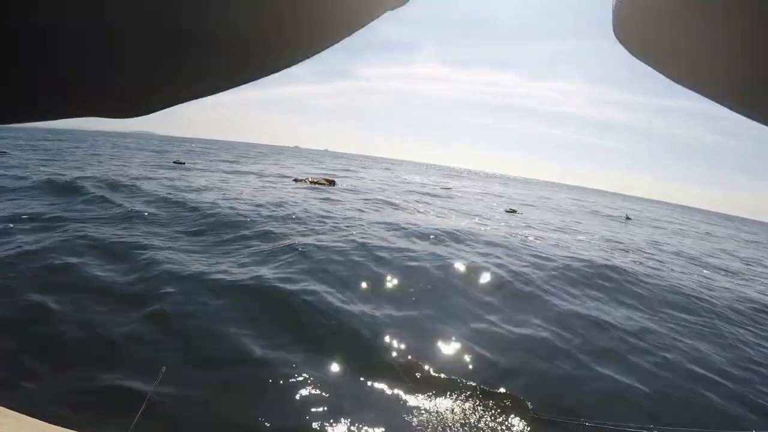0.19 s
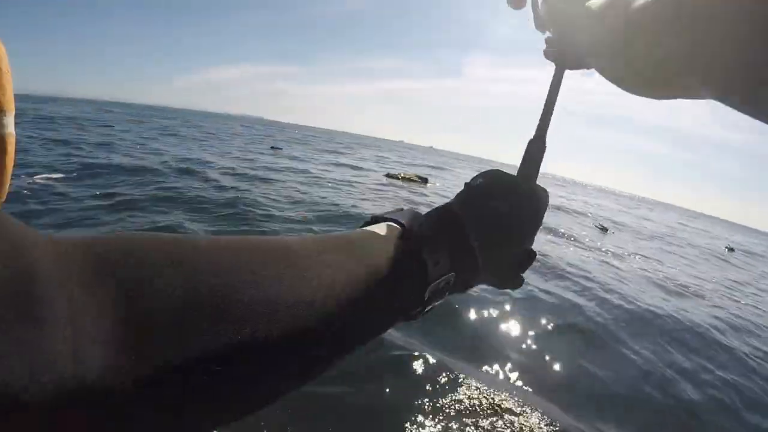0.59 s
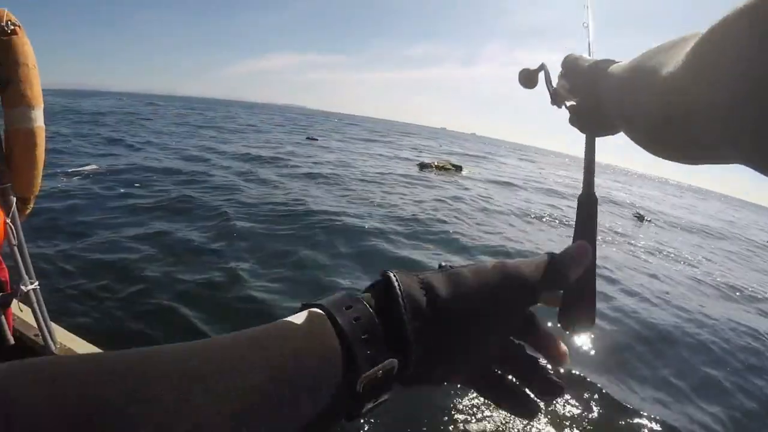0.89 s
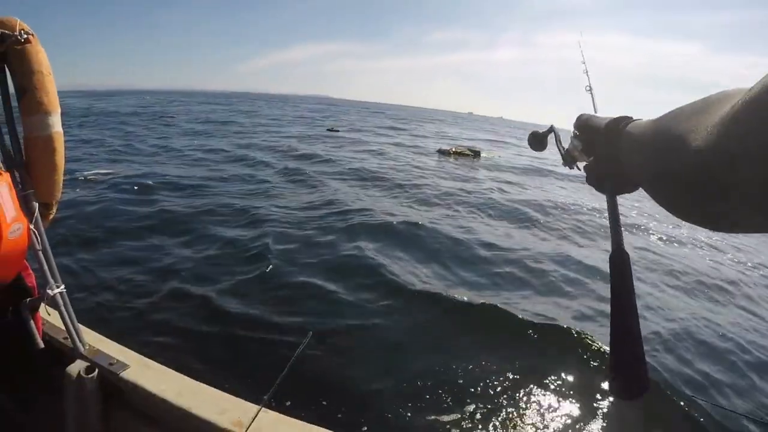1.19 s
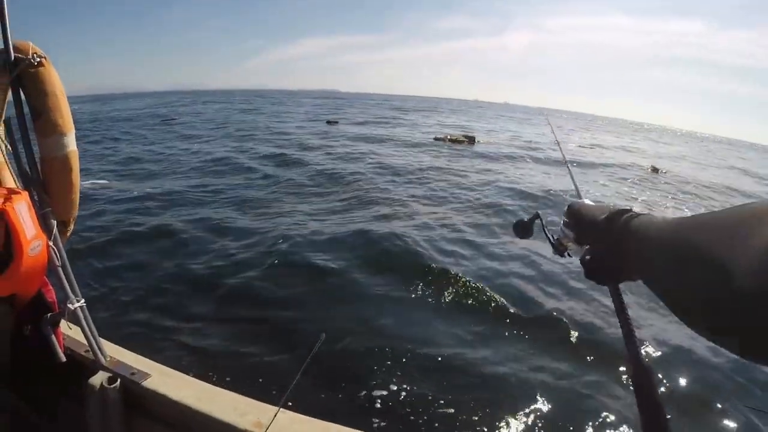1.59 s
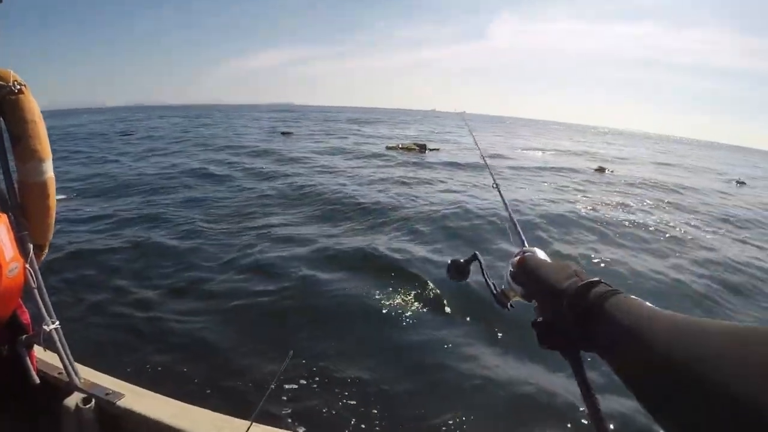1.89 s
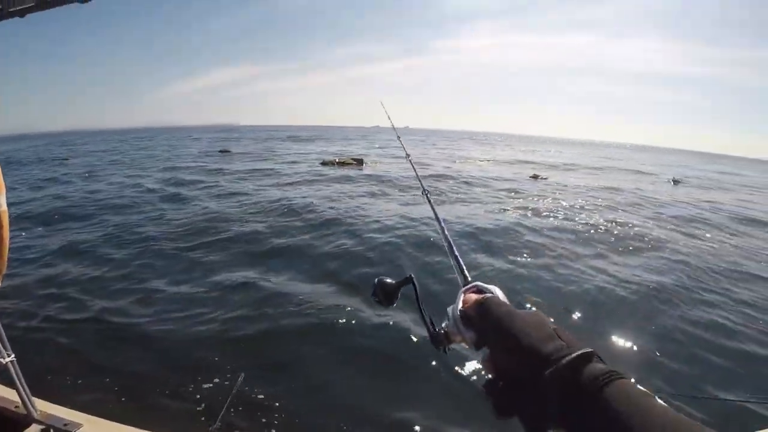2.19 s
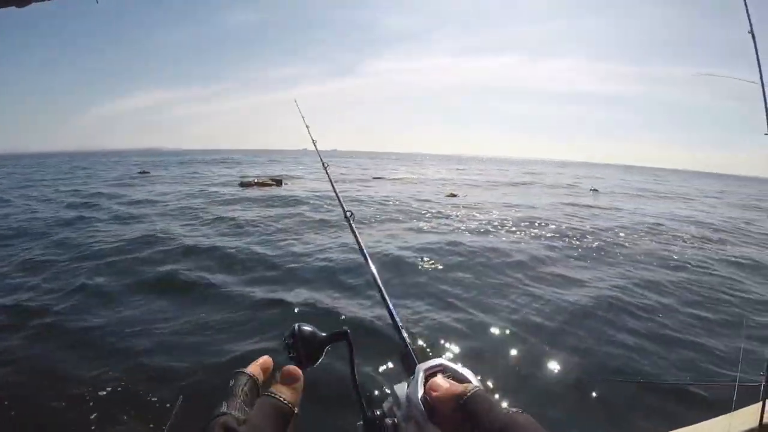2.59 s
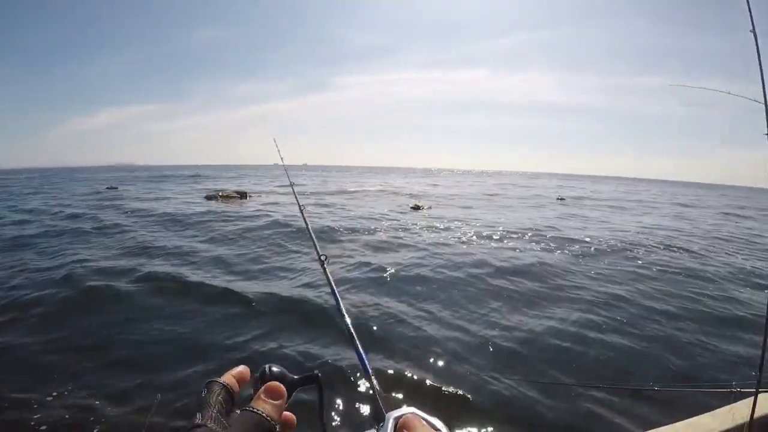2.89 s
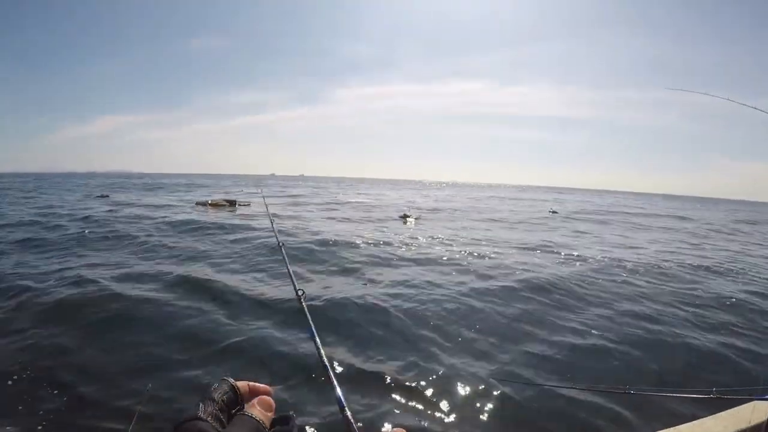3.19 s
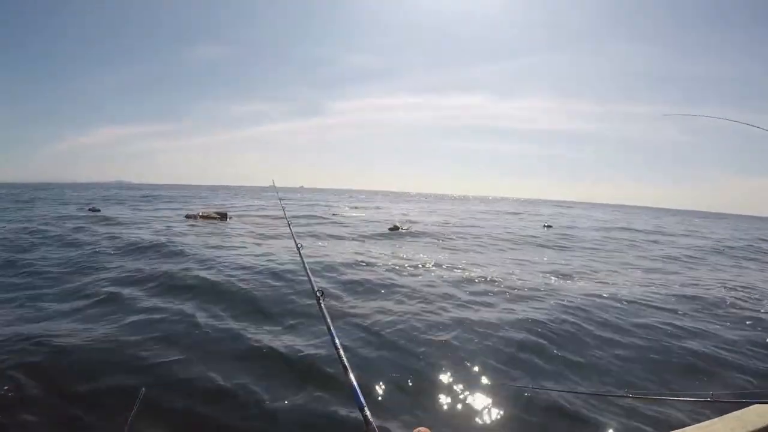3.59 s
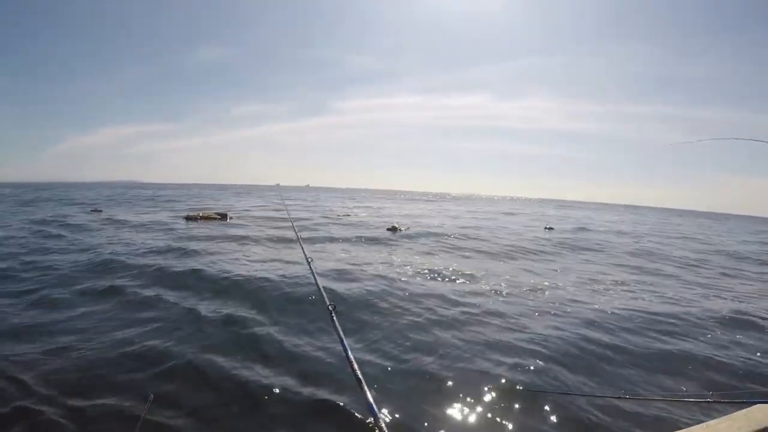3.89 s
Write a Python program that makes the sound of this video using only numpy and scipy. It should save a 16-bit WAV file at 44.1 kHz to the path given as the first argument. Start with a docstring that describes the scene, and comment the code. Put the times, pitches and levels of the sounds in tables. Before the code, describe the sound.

Sharp fishing reel and tackle clicks as an angler casts from a boat on quiet sea

```python
"""Sharp reel and tackle clicks and short rattles of an angler casting from a drifting boat, heard by a
small camera strapped to the body: noise bursts coloured by the ringing tackle. Straps knock and rub the
camera housing, as pushes exciting damped modes; sleeves rustle as crackly filtered noise.
Dull thumps come through the hull as decaying sines; sea wash and low wind are shaped noise beneath."""
import sys
import numpy as np
from scipy import signal
from scipy.fft import rfft, irfft
from scipy.io import wavfile
from scipy.ndimage import uniform_filter1d

SR = 44100
rng = np.random.default_rng(int(sys.argv[2]) if len(sys.argv) > 2 else 0)


def volts_from_decibels(level):
    """Turn decibel levels (scalar or array-like) into linear amplitude factors."""
    exponent = np.asarray(level, float) / 20
    return 10 ** exponent


def dump(signal):
    """Clip the signal to [-1, 1] and save it as 16-bit WAV at the path in sys.argv[1]."""
    limited = np.clip(np.atleast_2d(signal).T, -1, 1)
    pcm = np.round(limited * 32767).astype(np.int16)
    wavfile.write(sys.argv[1], SR, pcm)


N = 176400

# Reel and tackle clicks: start_s, relative_level_db, t60_s, centre_hz
CLICKS = [(0.117, -33.5, 0.0097, 6000), (0.2147, -15, 0.029, 1200), (0.2159, -29, 0.043, 6600),
          (0.3804, -18, 0.08, 3770), (0.3893, -2.5, 0.0061, 2900), (.391, -4.5, 0.0068, 2870),
          (0.513, -36, 0.028, 8200), (1.7799, -22.5, 0.0089, 2700), (2.2009, -22, 0.069, 4240),
          (2.4454, -25.5, 0.064, 1600), (2.929, -32.5, 0.085, 3470), (3.2415, -18.5, 0.041, 2160),
          (3.244, -7, 0.0094, 4480), (3.2481, -18, 0.021, 1930)]
# Resonances of the tackle: centre_hz, width_hz, relative_level_db
TACKLE_MODES = [(1600, 240, 7), (3406, 510, 6.5), (5260, 67, 10.5), (7900, 100, 17.5)]
# Momentary rattles of line and tackle: start_s, relative_level_db, length_s, centre_hz
RATTLES = [(0.06, -32, 0.023, 3250), (2.198, -12.5, 0.018, 1900), (2.314, -31.5, 0.08, 2360),
           (2.445, -24.5, 0.018, 4600), (2.477, -27.5, 0.03, 1670), (3.721, -19.5, 0.018, 1720)]
# Straps striking the housing: start_s, relative_force_db, contact_ms, deep_mode_weight_db
KNOCKS = [(0.441, -26.5, 0.89, 6.5), (0.477, -29, 0.56, 4), (.506, -19, 0.7, 5.5),
          (.686, -40.5, 0.45, 10.5), (1.397, -37.5, 0.94, 7), (1.507, -21, 1.4, 3), (1.541, -31.5, 2, 6.5),
          (1.713, -33.5, 1.2, 7), (2.207, -26, 0.53, -4.5), (2.603, -27, 1.23, -3), (2.617, -26.5, 1.23, 1),
          (2.663, -32.5, 1.18, -26), (2.701, -32.5, 1.63, 10.5), (2.782, -23.5, 0.78, -4),
          (2.877, -25.5, 0.54, -10), (2.931, -23, 0.62, -14), (3.041, -30, 0.99, -11),
          (3.052, -21.5, 0.61, -16), (3.116, -26, 1.5, -3), (3.331, -33.5, 1, 7.5), (3.36, -28, 0.6, -2),
          (3.422, -31, 1.1, -10), (3.545, -24, 0.62, -5.5), (3.911, -34, 1, -1)]
# Modes of the housing: mode_hz, left_level_db, right_level_db, right_lag_rad, t60_s
HOUSING_MODES = [(157, -4, -3.5, 1.3, 0.023), (329, 6, -4.5, 1.2, 0.012), (479.6, 2.5, -3, 2.665, 0.039),
                 (652, 3, -7.5, 2.3, 0.015), (775.5, 3.5, 2.5, 2.79, 0.022), (1043, 10.5, 12, 3.75, 0.011),
                 (1161, 9, 9.5, 3.67, 0.014), (1630, 3.5, -2.5, 3.63, 0.0085), (2360, -3, -4, 2.54, 0.038)]
# Straps and sleeves in motion: time_s, relative_rub_level_db, relative_rustle_level_db
MOTION = [(0, -44, -41.5), (.15, -36, -38.5), (.31, -31, -28.5), (.39, -36.5, -25.5), (.48, -34.5, -32),
          (.66, -39.5, -38.5), (.8, -43.5, -50.5), (1.2, -46.5, -45), (1.68, -43.5, -48),
          (1.85, -42, -38.5), (2.17, -39.5, -45), (2.26, -35, -34.5), (2.4, -37, -42.5), (2.71, -40.5, -45),
          (2.88, -48.5, -54), (3.08, -43, -50), (3.13, -32, -43), (3.22, -26.5, -44), (3.31, -34.5, -40.5),
          (3.41, -48, -49), (3.78, -50, -48), (3.93, -52, -42.5)]
# Spectrum shape of the cloth: frequency_hz, relative_density_db_per_hz
CLOTH_SPECTRUM = [(710, -14.5), (1200, 2.5), (2300, -10), (2980, -8.5), (4800, -15.5), (5470, -11.5),
                  (12500, -29), (14000, -36), (16000, -94)]
# Thumps through the hull: start_s, relative_level_db
THUMPS = [(0.078, -29.5), (0.216, -8.5), (0.338, -22.5), (2.93, -20.5), (3.577, -29.5)]
# Modes of the hull: mode_hz, relative_level_db, t60_s
HULL_MODES = [(154.8, 0, 0.31), (179.5, 0, 0.18), (199, 7.5, 0.062), (249, 4, 0.11), (1446, -3, 0.025)]
# Spectrum shapes of the sea, mid and side: frequency_hz, relative_density_db_per_hz
SEA_MID_SPECTRUM = [(74, -9), (125, 12.5), (298, -8.5), (350, 1), (752, -19.5), (1100, -10.5), (1380, -15),
                    (3420, -18), (4620, -28.5), (7350, -19), (11000, -26.5), (13200, -55), (15500, -75)]
SEA_SIDE_SPECTRUM = [(74, -49), (125, -15), (173, -3.5), (329, -9), (591, -11), (1100, -5), (2020, -13),
                     (2330, -22.5), (3850, -32), (8990, -23.5), (11000, -36), (15500, -51)]
# Wind on the microphone: time_s, mid_level_db
GUSTS = [(0.0, -80), (0.21, -56), (0.24, -47), (0.53, -29.5), (0.57, -39), (1.07, -35), (1.24, -47),
         (1.27, -40), (1.74, -50.5), (2.58, -57.5), (2.61, -48), (2.65, -59.5), (3.38, -54), (3.4, -65),
         (4.0, -72)]
# Spectrum shape of the wind: frequency_hz, relative_density_db_per_hz
WIND_SPECTRUM = [(12, -18), (24, 4.5), (45, -8), (90, -10.5), (120, -29), (170, -51), (400, -110)]
# Leftward bias of every noise pair: frequency_hz, mid_side_correlation (-1 to 1)
LEAN = [(200, -0.2), (450, -0.43), (900, -0.13), (6000, -0.11), (9500, -0.91), (14000, 0.35)]

# Clicks: band half-width, rise, share of noise common to both ports, and the tail
CLICK_OCTAVES, CLICK_RISE_S, PORT_SHARE = 1.18, 0.00025, 0.37
CLICK_TAIL_DB, CLICK_TAIL_T60_S = -27.5, 0.1
CLICK_TOP_HZ, RATTLE_TOP_HZ = 11100, 9900  # treble falls away above; click tails use the latter
RING_DB, TACKLE_RIGHT_DB = -7, 3.5
TACKLE_SPREAD = 0.014  # each grip shifts the ringing by about this fraction
# Rattles: rise and fade in units of the length; the treble is weaker and fades sooner
RISE_LENGTHS, T60_LENGTHS, RATTLE_DB, GRIT_DB = 0.25, 5.7, -10, 1.5
BRIGHT_HZ, BRIGHT_DB, BRIGHT_FADE_SHARE = 5550, -11, 0.35
# Knocks: bounce, random mode spread and gain
BOUNCE_S, BOUNCE_DB, SPREAD_DB, KNOCK_DB = 0.00488, -18.5, 2.5, 10
DEEP_HZ = 350
SWELL_CYCLES = 0.35  # build-up time constant of each housing mode, so deep modes speak last
RUBS_PER_S, RUB_SIZE_DB, RUB_CONTACT_MS, RUB_DB, RUB_DEEP_DB = 1500, 3, 0.44, 3.5, -1
CLOTH_SIDE_DB, CLOTH_DB, CRACKLE_DB = -1.5, -5, 2
THUMP_DB, THUMP_RISE_S = -12, 0.0014
KNOCK_HULL_DB = -9  # share of a knock's force that reaches the hull
SEA_MID_DB, SEA_SIDE_DB = -46, -44
WIND_SIDE_DB = -14.5
LOW_CUT_HZ, EDGE_HZ = 131.4, 16200


def evened(x):
    """Normalisation to unit root-mean-square."""
    return x / np.sqrt(np.mean(x ** 2) + 1e-20)


def read(points, hz):
    """Linear interpolation of a table on a logarithmic frequency axis."""
    f, value = np.transpose(points)
    return np.interp(np.log(hz + 1), np.log(f + 1), value)


def curve(table, column):
    """Linear interpolation of one table column at every sample time."""
    rows = np.array(table)
    return np.interp(np.arange(N) / SR, rows[:, 0], rows[:, column])


def add(mix, start_s, sound):
    """Superposition of a sound on the mix from a given time."""
    part = mix[..., max(round(start_s * SR), 0):][..., :sound.shape[-1]]
    part += sound[..., :part.shape[-1]]


def ports(mid, side):
    """Sum and difference of mid and side give the left and right ports."""
    return np.array([mid + side, mid - side])


def burst(centre_hz, octaves, top_hz):
    """Resonant filtering: band noise coloured by the tackle, partly correlated between the ports."""
    hz = np.fft.rfftfreq(8192, 1 / SR) + 1
    shifts = 1 + TACKLE_SPREAD * rng.standard_normal(len(TACKLE_MODES))
    ring = 1
    for (mode_hz, width_hz, db), shift in zip(TACKLE_MODES, shifts):
        ring = ring + volts_from_decibels(db + RING_DB) / (1 + (2 * (hz - mode_hz * shift) / width_hz) ** 2)
    band = np.exp(-(np.log2(hz / centre_hz) / octaves) ** 2) / (1 + (hz / top_hz) ** 6)
    left, other = rng.standard_normal((2, 8192))
    right = PORT_SHARE * left + np.sqrt(1 - PORT_SHARE ** 2) * other
    coloured = irfft(rfft([left, right]) * ring * band)
    return evened(coloured * volts_from_decibels(np.array([[0], [TACKLE_RIGHT_DB]])))


def clicks():
    """Impulsive excitation of the tackle: a fast-rising, decaying snap with a weaker, longer tail."""
    out, t = np.zeros((2, N)), np.arange(8192) / SR
    for start_s, db, t60, centre_hz in CLICKS:
        snap = volts_from_decibels(-60 * t / t60) * burst(centre_hz, CLICK_OCTAVES, CLICK_TOP_HZ)
        tail_fade = volts_from_decibels(CLICK_TAIL_DB - 60 * t / CLICK_TAIL_T60_S)
        tail = tail_fade * burst(1.24 * centre_hz, 1.0, RATTLE_TOP_HZ)
        rise = np.minimum(t / CLICK_RISE_S, 1)
        add(out, start_s, volts_from_decibels(db) * rise * (snap + tail))
    return out


def rattles():
    """Frequency-dependent decay: gritty noise bursts whose added treble fades first."""
    out, t = np.zeros((2, N)), np.arange(8192) / SR
    for start_s, db, length_s, centre_hz in RATTLES:
        grit = evened(uniform_filter1d(rng.standard_normal(len(t)), size=90))
        rise = np.minimum(t / (RISE_LENGTHS * length_s), 1)
        fade_db = -60 * np.maximum(t - 0.5 * length_s, 0) / (T60_LENGTHS * length_s)
        body = volts_from_decibels(fade_db) * burst(centre_hz, 1.05, RATTLE_TOP_HZ)
        bright_fade = volts_from_decibels(BRIGHT_DB + fade_db / BRIGHT_FADE_SHARE)
        bright = bright_fade * burst(BRIGHT_HZ, 1.0, RATTLE_TOP_HZ)
        add(out, start_s, volts_from_decibels(db + RATTLE_DB + GRIT_DB * grit) * rise * (body + bright))
    return out


def housing(colour_db, contact_ms, deep_db):
    """Modal response: damped housing modes convolved with a soft push lasting the contact time."""
    hz, left_db, right_db, lag, t60 = np.array(HOUSING_MODES).T[..., None]
    t = np.arange(3500) / SR
    fade_db = colour_db + deep_db * (hz < DEEP_HZ) - 60 * t / t60
    sign = (-1) ** np.arange(len(hz))[:, None]  # neighbouring modes alternate in polarity
    swell = sign * (1 - np.exp(-t * hz / SWELL_CYCLES))
    left = (volts_from_decibels(left_db + fade_db) * swell * np.sin(2 * np.pi * hz * t)).sum(0)
    right = (volts_from_decibels(right_db + fade_db) * swell * np.sin(2 * np.pi * hz * t - lag)).sum(0)
    contact_phase = np.arange(200) / SR / (contact_ms / 1000)
    push = np.sin(np.pi * np.minimum(contact_phase, 1)) ** 2
    return signal.oaconvolve(np.array([left, right]), push[None] / push.sum(), axes=1)


def knocks():
    """Impact excitation: each strap blow weights the modes a little differently and bounces once."""
    out = np.zeros((2, N))
    chance = rng.standard_normal((len(KNOCKS), len(HOUSING_MODES) + 1))
    for (start_s, db, contact_ms, deep_db), (late, *colour) in zip(KNOCKS, chance):
        colour_db = SPREAD_DB * np.array(colour)[:, None]
        ring = volts_from_decibels(db + KNOCK_DB) * housing(colour_db, contact_ms, deep_db)
        add(out, start_s, ring)
        add(out, start_s + BOUNCE_S * (1 + 0.15 * late), volts_from_decibels(BOUNCE_DB) * ring)
    return out


def rubbing():
    """Stick-slip friction: straps excite the housing by many tiny random slips."""
    slips = (rng.random(N) < RUBS_PER_S / SR) * rng.choice([-1, 1], N)
    slips = slips * volts_from_decibels(RUB_SIZE_DB * np.minimum(rng.exponential(1, N), 5))
    response = housing(0, RUB_CONTACT_MS, RUB_DEEP_DB)
    rub = signal.oaconvolve(slips[None], response, axes=1)[:, :N]
    return volts_from_decibels(curve(MOTION, column=1) + RUB_DB) * evened(rub)


def noise_pair(mid_shape, side_shape, patchy_db, flicker_db, swell_db, size):
    """Spectral shaping of partly correlated mid and side noise, with patches, wide flicker and swell."""
    frames, hz = N * 4 // size + 5, np.fft.rfftfreq(size, 1 / SR)
    a, b, c, d, patches = rng.standard_normal((frames, len(hz), 5)).T
    flicker = evened(uniform_filter1d(patches, size=len(hz) // 3, axis=0))
    patches = uniform_filter1d(patches, size=10, axis=0)  # across frequency
    patches = evened(uniform_filter1d(patches, size=12, axis=1))  # across time
    t = np.arange(frames) * size / 4 / SR
    swell = np.zeros(frames)
    for f in np.geomspace(0.5, 12, num=24):
        swell += np.sin(2 * np.pi * (f * t + rng.random())) / np.sqrt(f)
    lean = np.clip(read(LEAN, hz), -0.95, 0.95)[:, None]
    mid = a + 1j * b
    side = lean * mid + np.sqrt(1 - lean ** 2) * (c + 1j * d)
    shape_db = np.array([read(mid_shape, hz), read(side_shape, hz)])[..., None]
    motion_db = patchy_db * patches + flicker_db * flicker + swell_db * evened(swell)
    spectra = np.array([mid, side]) * volts_from_decibels(shape_db + motion_db)
    sounds = signal.istft(spectra, nperseg=size, noverlap=size * 3 // 4)[1]
    return [evened(sound) for sound in sounds[:, :N]]


def cloth():
    """Friction noise: sleeves rustle in fine crackly hiss while the arms move."""
    mid, side = noise_pair(CLOTH_SPECTRUM, CLOTH_SPECTRUM, 1.2, 0.98, 2.85, size=256)
    crackle = evened(uniform_filter1d(rng.exponential(1, N) ** 2 - 2, size=60))
    level_db = curve(MOTION, column=2) + CLOTH_DB + CRACKLE_DB * crackle
    return volts_from_decibels(level_db) * ports(mid, volts_from_decibels(CLOTH_SIDE_DB) * side)


def thumps():
    """Structure-borne sound: dull blows and part of each knock ring the hull, alike at both ports."""
    out, t = np.zeros(N), np.arange(8000) / SR
    hz, mode_db, t60 = np.array(HULL_MODES).T[..., None]
    ring = (volts_from_decibels(mode_db - 60 * t / t60) * np.sin(2 * np.pi * hz * t)).sum(0)
    ring *= np.minimum(t / THUMP_RISE_S, 1)
    from_knocks = [(start_s, db + KNOCK_HULL_DB) for start_s, db, *_ in KNOCKS]
    for start_s, db in THUMPS + from_knocks:
        add(out, start_s, volts_from_decibels(db + THUMP_DB) * ring)
    return out


def sea():
    """Broadband turbulence noise: small waves wash along the hull."""
    mid, side = noise_pair(SEA_MID_SPECTRUM, SEA_SIDE_SPECTRUM, 0.84, 2.83, 0.64, size=512)
    return ports(volts_from_decibels(SEA_MID_DB) * mid, volts_from_decibels(SEA_SIDE_DB) * side)


def wind():
    """Low-frequency pressure noise: a lumpy rumble in gusts, nearly alike at both ports."""
    mid, side = noise_pair(WIND_SPECTRUM, WIND_SPECTRUM, 1.2, 1.5, 2.5, size=4096)
    return volts_from_decibels(curve(GUSTS, column=1)) * ports(mid, volts_from_decibels(WIND_SIDE_DB) * side)


def scene():
    """Superposition of all sources; a high-pass on all but the wind leaves it the deep bass."""
    near = sea() + cloth() + knocks() + rubbing() + thumps() + clicks() + rattles()
    low_cut = signal.butter(6, LOW_CUT_HZ, "high", fs=SR, output="sos")
    return signal.sosfilt(low_cut, near) + wind()


def roll_off(x):
    """The treble ends steeply here."""
    return signal.sosfilt(signal.butter(12, 16320, fs=SR, output="sos"), x)


def record(dry):
    """Saturation and band limiting: soft overload rounds the sharpest peaks before a low-pass."""
    overloaded = np.tanh(dry)
    low_pass = signal.firwin(255, EDGE_HZ, fs=SR)
    mix = signal.oaconvolve(overloaded, low_pass[None], "same")
    return roll_off(mix)


dry = scene()
out = record(dry)
dump(out)
```